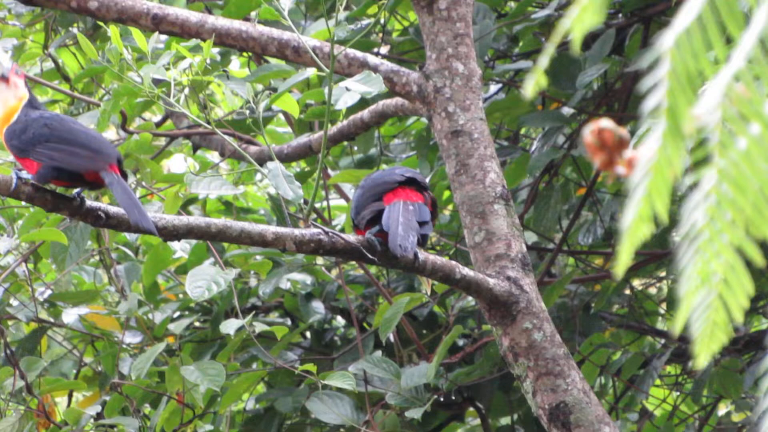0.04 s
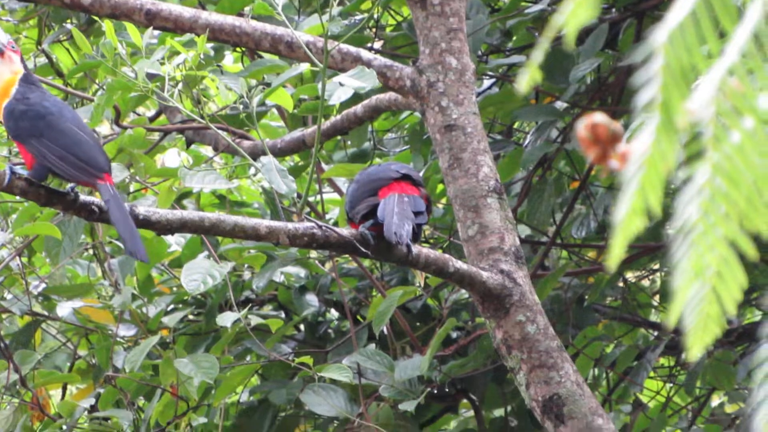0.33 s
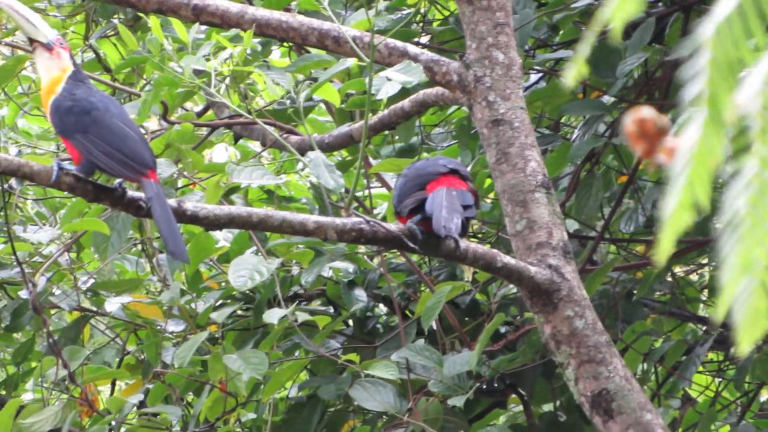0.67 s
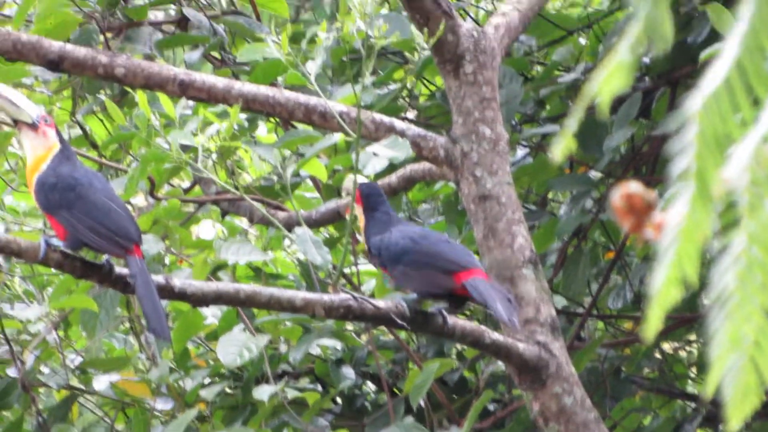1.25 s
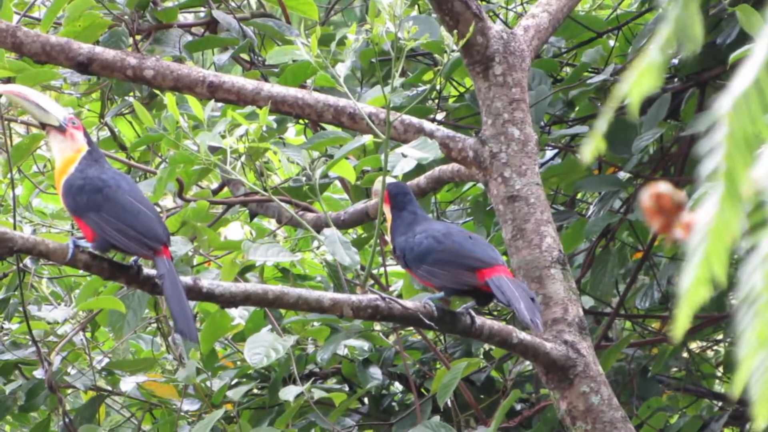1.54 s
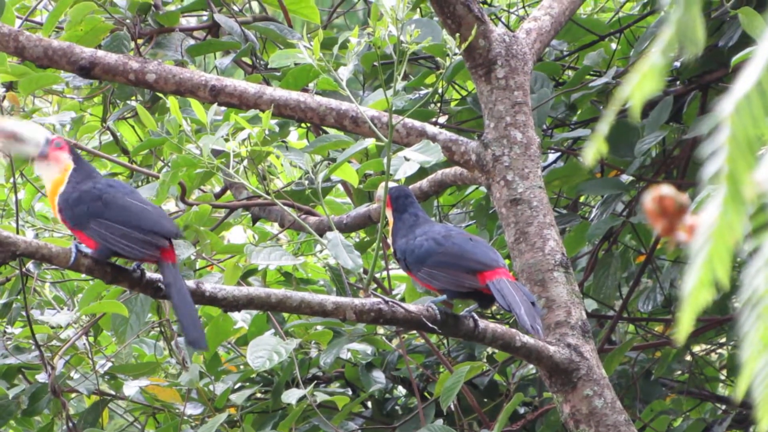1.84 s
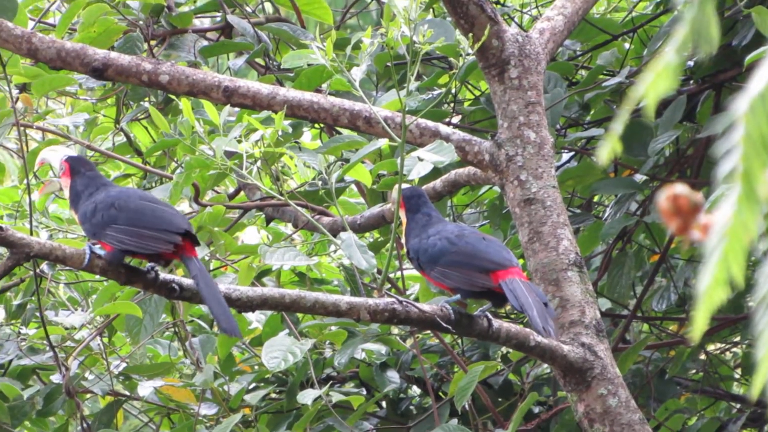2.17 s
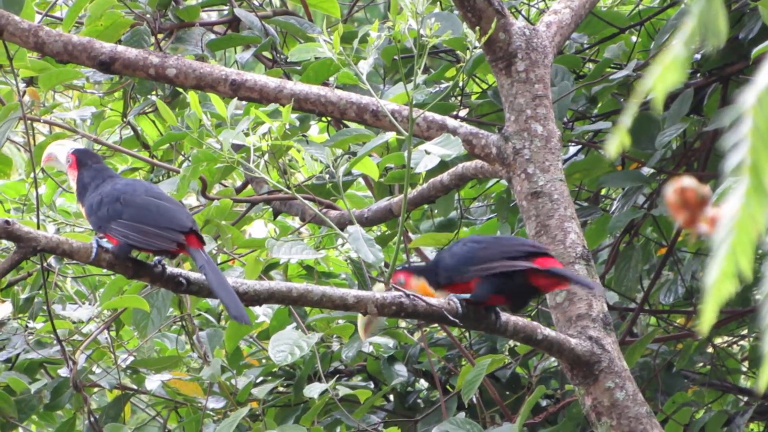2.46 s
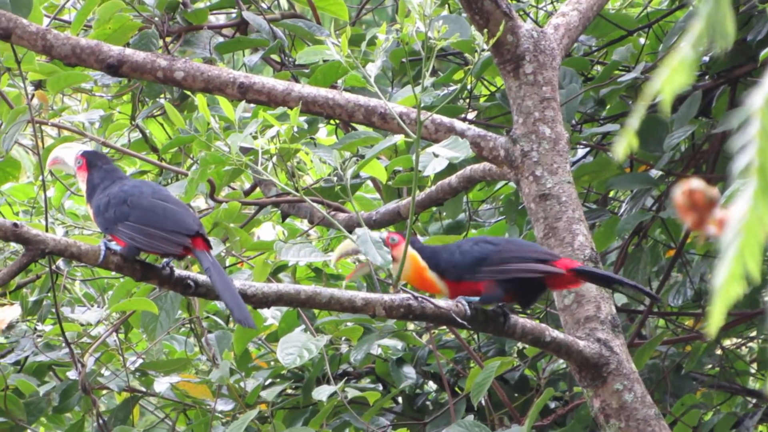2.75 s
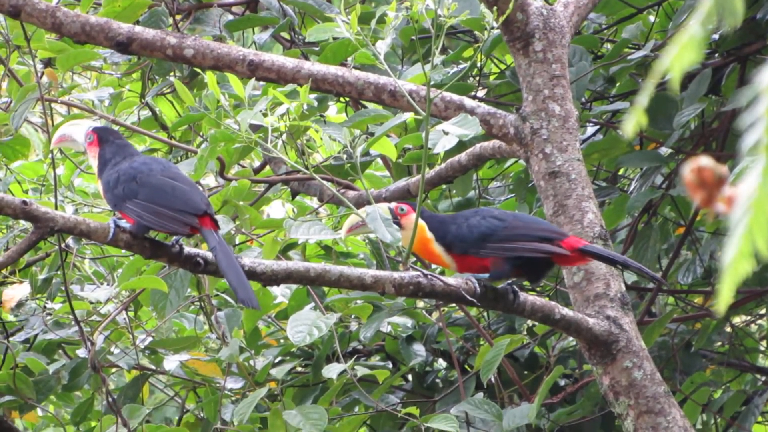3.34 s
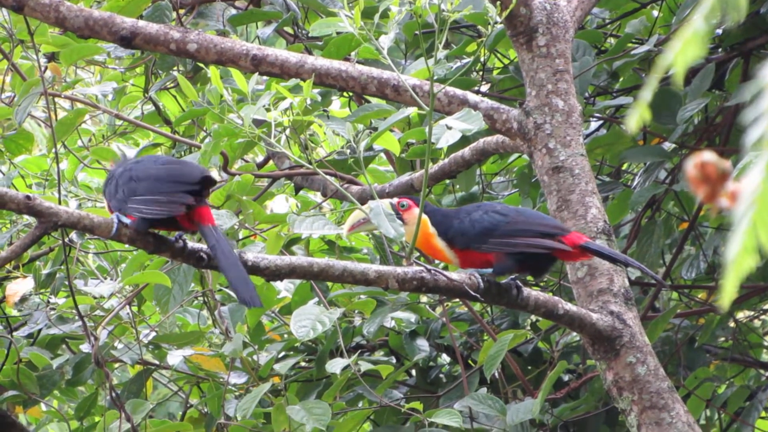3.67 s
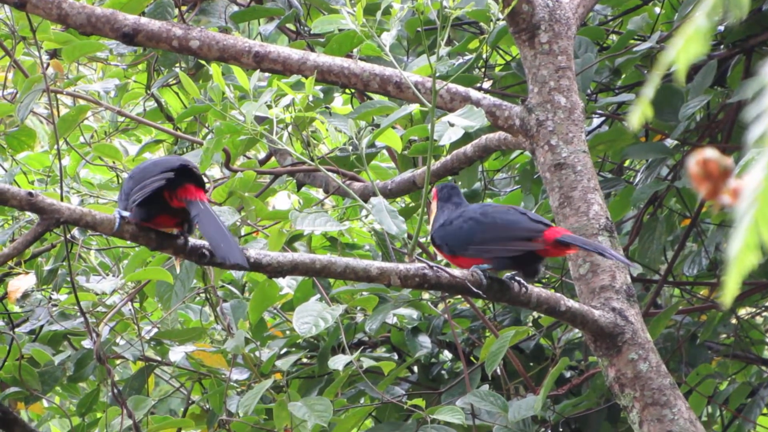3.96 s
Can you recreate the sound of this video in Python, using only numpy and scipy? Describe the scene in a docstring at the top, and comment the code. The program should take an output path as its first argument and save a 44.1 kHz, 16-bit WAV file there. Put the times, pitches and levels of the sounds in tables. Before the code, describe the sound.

A toucan gives five short, harsh croaks at about 0.1, 1.1, 1.9, 2.6 and 3.8 seconds, the last quieter, each echoing in the trees. Another toucan rattles softly from 0.4 to 1.8 seconds, with brief rustles early and thin squeaks at the second croak. Distant birds whistle near 1.8 seconds and from 3.1, with one rising chirp at 3.7. Faint low forest air continues underneath.

```python
"""Two toucans in a tree, over a faint low murmur of forest air. One gives the first of five harsh croaks:
a falling reedy tone, chopped into rapid pulses, rings its throat and bill, and the trees echo it.
The other rattles softly through the second croak, with brief high rustles early on. Small birds
whistle farther off, thin squeaks join the second croak, and after the third and fourth come more
whistles and one rising chirp, just ahead of the last croak."""
import sys
import numpy as np
from scipy import signal
from scipy.fft import rfft, irfft, next_fast_len
from scipy.io import wavfile

SR = 44100
rng = np.random.default_rng(int(sys.argv[2]) if len(sys.argv) > 2 else 0)


def unload_audio(sound):
    """Save the sound as a 16-bit wav file, at the path given as the first command line argument."""
    columns = np.transpose(np.atleast_2d(sound))
    # keep every value between -1 and 1, then stretch to whole-number steps
    steps = np.round(np.clip(columns, -1, 1) * 32767)
    wavfile.write(sys.argv[1], SR, steps.astype(np.int16))


N = 176400


def undb(db):
    """Amplitude ratio of a level in decibels."""
    return 10 ** (np.asarray(db) / 20)


def unit(x):
    """Normalisation to an rms of 1."""
    return x / np.sqrt(np.mean(x ** 2) + 1e-20)


def colour(x, points, shift=1):
    """Minimum-phase filter through (Hz, dB) points, their frequencies scaled by shift."""
    size = 2 * next_fast_len(len(x))
    hz, db = np.array(points, float).T
    gain_db = np.interp(np.log(np.fft.rfftfreq(size, 1 / SR) + 1), np.log(np.sort(hz) * shift), db)
    cepstrum = irfft(np.log(undb(gain_db)))
    cepstrum[1:size // 2] *= 2
    cepstrum[size // 2 + 1:] = 0
    return irfft(rfft(x, size) * np.exp(rfft(cepstrum)))[:len(x)]


def noise():
    """Gaussian white noise."""
    return rng.standard_normal(N)


def wander(rate_hz):
    """Random modulation of rms 1, interpolated between rate_hz values a second."""
    return unit(np.interp(np.arange(N) / SR * rate_hz, np.arange(N), noise()))


def pan(x, right_db):
    """Direction from a level difference between the ears."""
    return x * undb(np.array([[-right_db], [right_db]]) / 2)


# Spectrum of the forest air. Each row: frequency in Hz, relative level in dB.
AIR_SPECTRUM = [(25, -8.5), (45, -9.5), (62, 2.5), (85, -2.5), (130, -3.5), (250, -7), (420, -8.5),
                (560, -6.5), (760, -3), (1100, -8.5), (1550, -11), (2100, -15), (2570, -10.5),
                (3930, -24.5), (5410, -13.5), (8070, -29), (13000, -31.5), (14500, -37)]
# Stereo width of the air. Each row: frequency in Hz, side level relative to mid in dB.
AIR_WIDTH = [(30, 3.5), (130, 4.5), (300, 10.5), (600, 2.5), (1500, -2), (5000, -2), (12000, 2)]


def forest_air(t):
    """Uncorrelated mid and side noise makes a wide, low murmur with a faint hiss."""
    mid, side = (unit(colour(noise(), AIR_SPECTRUM)) * undb(wander(4.64)) for _ in range(2))
    level_db = -45.5 - 3.5 * np.maximum(1 - t, 0)  # comes up over the first second
    return undb(level_db) * (mid + colour(side, AIR_WIDTH) * np.array([[1], [-1]]))


# Resonances of throat and bill. Each row: frequency in Hz when tuned to THROAT_HZ, relative gain in dB.
THROAT_RESPONSE = [(500, -26.5), (1250, -20.5), (1550, -26), (1880, -4), (2150, -3.5), (2460, 7), (2680, 3),
                   (2900, -7), (3180, -3), (3600, -37), (4200, -37), (4480, -11.5), (4750, -25),
                   (5300, -27), (5680, -11.5), (6100, -26), (7400, -38.5), (8500, -60)]
# Spectrum of the breathy rasp, with the same columns.
RASP_SPECTRUM = [(500, -28.5), (1500, -4), (1950, -0.5), (2500, 13.5), (2900, 3), (3300, 6), (3800, -3.5),
                 (4500, -7), (5050, 3), (5650, 4.5), (6200, -4.5), (7500, -5), (8100, -18), (9000, -24.5),
                 (10800, -19), (12800, -19), (14500, -39)]
# The first toucan's calls. Each row: start in seconds, rise time in seconds, rise exponent, length in
# seconds, level in dB, opening effort in dB, settled pulse rate in Hz, settled tone in Hz, fraction the
# tone starts sharp, main resonance in Hz, then hum, treble, top and right-over-left gains in dB.
CROAK_CALLS = [(0.096, 0.13, 1, 0.24, -25.5, -2.5, 93.4, 565, 0, 2296, -31, -2, -6, 2.2),
               (1.081, 0.18, 1.07, 0.28, -23, -13, 94.3, 622, 0.13, 2419, -19, 4, 6.5, 3.6),
               (1.9439, 0.092, 0.79, 0.38, -29.5, -33, 93.35, 575, 0.13, 2290, -21, -2, -4, 3),
               (2.5994, 0.12, 0.58, 0.28, -24.5, -28, 94.0, 622.7, .15, 2450, -15, 6, 4.5, 3.6),
               (3.8305, 0.2, 0.68, 0.27, -40, -28, 95.34, 612.6, .08, 2338, -7.5, -3, -4, 3.3)]
THROAT_HZ, RELEASE_S, SETTLE_S, BURST_S, RASP_S = 2460, .007, .11, .0027, .003


def croak(t, start, rise, bend, length, db, first_db, rate_hz, tone_hz, sag,
          throat_hz, hum_db, treble_db, top_db, right_db):
    """Source and filter: bursts of reedy clicks and breath excite the resonances of throat and bill."""
    age = np.maximum(t - start, 0)
    first = undb(first_db)
    attack = first + (1 - first) * np.minimum(age / rise, 1) ** bend
    effort = attack * np.exp(-np.maximum(age - length, 0) / RELEASE_S) * (t > start)
    tension = np.exp(-age / SETTLE_S)  # as it relaxes, tone and pulse rate sink and bursts lengthen
    pulse_hz = rate_hz * (1 + .03 * tension + .009 * wander(60))
    cycles = np.cumsum(pulse_hz * (t > start)) / SR
    from_centre_s = (cycles % 1 - .5) / rate_hz
    pulse_gain = undb(.7 * noise()[cycles.astype(int)])
    gate = pulse_gain * np.exp(-(from_centre_s / (BURST_S * (1 - .4 * tension))) ** 2)
    jitter = .022 + .1 * np.exp(-age / .05)  # roughest at the onset
    hz = tone_hz * (1 + sag * tension) * (1 + jitter * wander(400))
    phase = 2 * np.pi * hz * from_centre_s  # restarts with each pulse
    reed = sum(np.cos(k * phase) for k in range(1, 21))
    hum = np.sin(2 * np.pi * np.cumsum(hz) / SR)  # the fundamental carries on between pulses
    leak = .5 * np.minimum(age / .2, 1) ** 2  # late in the call the rasp fills the gaps
    breath = noise() * (1 + .5 * np.cos(phase)) * (np.exp(-(from_centre_s / RASP_S) ** 2) + leak)
    shift = throat_hz / THROAT_HZ
    voice = unit(colour(reed * gate, THROAT_RESPONSE, shift))
    voice += undb(hum_db) * np.sqrt(effort) * unit(hum)
    rasp = undb(-9) * unit(colour(breath, RASP_SPECTRUM, shift))
    shelves = [(3450, 0), (4450, treble_db), (8200, treble_db), (9200, top_db)]
    return undb(db) * effort * (pan(colour(voice, shelves), right_db) + colour(rasp, shelves))


# Scatter from near trunks and leaves. Each row: frequency in Hz, relative gain in dB.
NEAR_SCATTER = [(650, -8), (1000, -3), (1750, 1.5), (2300, -2), (3000, 3), (4500, 2), (9000, 1)]
# Echo from the forest behind, with the same columns.
FAR_SCATTER = [(300, -6), (650, -9), (1700, 0), (2300, -3.5), (3000, 1), (4000, -4), (5600, 1), (12000, -3)]


def tree_echo(x, t):
    """Reverberation: one distinct trunk reflection, and diffuse scatter that decays exponentially."""
    def tail(spectrum, t60_s):
        build_up = 1 - np.exp(-t / .006)
        return colour(unit(noise() * build_up * 1000 ** (-t / t60_s)), spectrum)

    def diffuse():
        response = undb(-7) * tail(NEAR_SCATTER, t60_s=.6) + undb(-10) * tail(FAR_SCATTER, t60_s=.9)
        return signal.fftconvolve(x, response)[:N] / np.sqrt(N)

    delay_s, width = .032, .48
    trunk = undb(-11) * np.interp(t - delay_s, t, colour(x, NEAR_SCATTER))
    return trunk + diffuse() + width * diffuse() * np.array([[1], [-1]])


# The second toucan's strokes. Each row: start in seconds, relative peak level in dB.
RATTLE_STROKES = [(0.359, -40), (0.392, -39.5), (0.434, -35), (0.478, -38), (0.526, -34), (0.565, -40.5),
                  (0.6, -37.5), (0.642, -36), (0.693, -33), (0.727, -38.5), (0.769, -36.5), (0.811, -36),
                  (0.849, -40), (0.889, -35.5), (0.930, -37.5), (0.976, -39.5), (1.029, -35),
                  (1.061, -34.5), (1.102, -34.5), (1.144, -35.5), (1.196, -37), (1.226, -32),
                  (1.268, -32.5), (1.311, -38), (1.366, -33), (1.396, -35.5), (1.436, -34), (1.479, -32.5),
                  (1.530, -32.5), (1.560, -34), (1.604, -34.5), (1.641, -32.5), (1.694, -33),
                  (1.735, -32.5), (1.768, -34.5), (1.807, -30)]
# Hollow resonances of the rattle. Each row: frequency in Hz, relative gain in dB.
RATTLE_RESPONSE = [(180, -35), (312, 6), (410, -18), (505, 2.5), (590, -21), (721, 7.5), (930, -11),
                   (1140, -3), (1450, -23), (1900, -5), (2600, -10.5), (3300, -8), (3800, -31), (9000, -67)]
STROKE_S, GLIDE_S, STROKE_FROM_HZ, STROKE_TO_HZ = .004, .005, 1400, 620


def rattle(t):
    """Pulsed excitation: puffs of noise ring throaty resonances, each with a quick downward sweep."""
    puffs, tone = np.zeros(N), np.zeros(N)
    for start, db in RATTLE_STROKES:
        span = (t > start) & (t < start + 10 * STROKE_S)
        age = t[span] - start
        envelope = undb(db) * (age / STROKE_S * np.exp(1 - age / STROKE_S)) ** .91
        hz = STROKE_TO_HZ + (STROKE_FROM_HZ - STROKE_TO_HZ) * np.exp(-age / GLIDE_S)
        detune = 1 + .04 * rng.standard_normal()
        puffs[span] += envelope
        tone[span] += envelope * np.sin(2 * np.pi * np.cumsum(hz) / SR * detune)
    hollow = unit(colour(puffs * noise(), RATTLE_RESPONSE)) * np.sqrt(np.mean(puffs ** 2))
    return undb(-3.5) * (hollow + undb(-3) * tone)


# Soft rustles. Each row: centre in seconds, half-width in seconds, peak level in dB.
RUSTLE_SWELLS = [(0.487, 0.02, -50), (0.584, 0.017, -46), (0.7, 0.029, -49.5)]
# Their spectrum. Each row: frequency in Hz, relative level in dB.
RUSTLE_SPECTRUM = [(3000, -1.5), (6000, -2), (8200, -1.5), (11000, -18), (14000, -23)]


def rustles(t):
    """Amplitude modulation: Gaussian envelopes shape bright noise into short swishes."""
    envelope = sum(undb(db) * np.exp(-((t - at) / half) ** 2) for at, half, db in RUSTLE_SWELLS)
    return envelope * unit(colour(noise(), RUSTLE_SPECTRUM))


def gliding_note(t, contour, jitter, octave_db):
    """Frequency modulation: a tone and its weak octave follow a pitch contour with random jitter."""
    times, hz, db = np.array(contour).T
    pitch_hz = np.interp(t, times, hz) * (1 + jitter * wander(700))
    phase = 2 * np.pi * np.cumsum(pitch_hz) / SR
    envelope = undb(np.interp(t, times, db)) * (t > times[0]) * (t < times[-1])
    return envelope * (np.sin(phase) + undb(octave_db) * np.sin(2 * phase))


# Distant birds, one list a note. Each row: time in seconds, pitch in Hz, relative level in dB.
WHISTLE_CONTOURS = [
    [(1.785, 2390, -63), (1.83, 2300, -42), (1.87, 2220, -52), (1.95, 2196, -34)],
    [(3.15, 2540, -43.5), (3.3, 2510, -45.5), (3.47, 2590, -46), (3.57, 2520, -78)],
    [(3.545, 2130, -45), (3.62, 2410, -43), (3.675, 1910, -39.5), (3.73, 1885, -43)],
    [(3.725, 2030, -39), (3.78, 2082, -39), (3.83, 2160, -32), (3.88, 2080, -50)],
    [(0.555, 7200, -44), (0.58, 7150, -47), (0.592, 7030, -56), (0.61, 6750, -60)],
]


def whistles(t):
    """Nearly pure tones: with almost no overtone, the small birds' notes sound thin."""
    return sum(gliding_note(t, contour, jitter=.01382, octave_db=-52) for contour in WHISTLE_CONTOURS)


# Squeaks in the second croak, one list each. Each row: time in seconds, pitch in Hz, level in dB.
SQUEAK_CONTOURS = [
    [(1.09, 5950, -72), (1.1, 6200, -43), (1.14, 6600, -54), (1.19, 6170, -40)],
    [(1.135, 4830, -44), (1.165, 4720, -44), (1.21, 4550, -43)],
]


def squeaks(t):
    """Spectral broadening: strong pitch jitter spreads each high tone into a narrow band."""
    return sum(gliding_note(t, contour, jitter=.045, octave_db=-21) for contour in SQUEAK_CONTOURS)


# A small bird's chirp. Each row: time in seconds, pitch in Hz, relative level in dB.
CHIRP_CONTOUR = [(3.671, 5320, -56), (3.679, 5440, -35.5), (3.686, 5710, -40.5), (3.697, 6850, -39),
                 (3.721, 7150, -43.5), (3.76, 7100, -60)]
# Its treble roll-off. Each row: frequency in Hz, gain in dB.
CHIRP_ROLLOFF = [(11500, 0.5), (14000, -13)]


def chirp(t):
    """A rising sweep through a low-pass filter: the octave fades as the note climbs."""
    return colour(gliding_note(t, CHIRP_CONTOUR, jitter=.026, octave_db=-12), CHIRP_ROLLOFF)


def scene():
    """Superposition of direct sound, echo and air; the distant birds have a weaker direct path."""
    t = np.arange(N) / SR
    calls = sum(croak(t, *row) for row in CROAK_CALLS) + squeaks(t)
    strokes, far_birds, small_bird = rattle(t), whistles(t), chirp(t)
    direct = calls + strokes + rustles(t) + undb(-7) * far_birds + small_bird
    into_trees = calls.mean(axis=0) + undb(-1) * strokes + far_birds + undb(4) * small_bird
    return forest_air(t) + direct + pan(tree_echo(into_trees, t), right_db=3.5)


def record(dry):
    """Gating and band limiting: the sound opens after a brief silence and loses its highest treble."""
    start_s, fade_s, top_hz = .095, .002, 14400
    t = np.arange(N) / SR
    gate = (t > start_s) * np.minimum(t[::-1] / fade_s, 1)
    return signal.sosfilt(signal.ellip(8, .2, 70, top_hz, fs=SR, output="sos"), dry * gate)


dry = scene()
out = record(dry)
unload_audio(out)
```